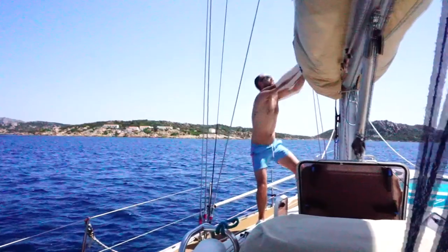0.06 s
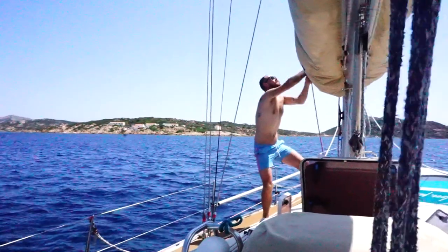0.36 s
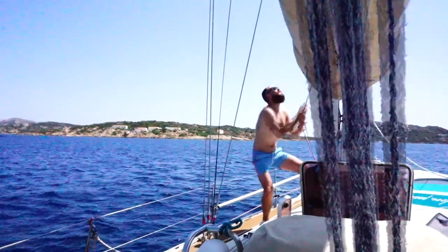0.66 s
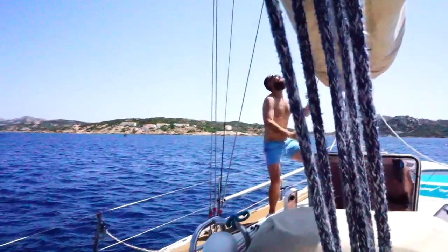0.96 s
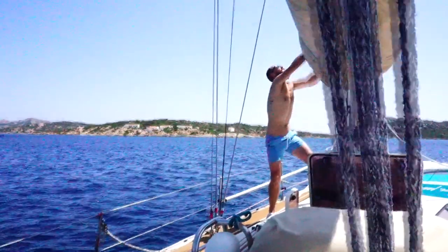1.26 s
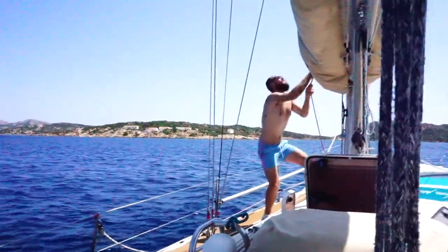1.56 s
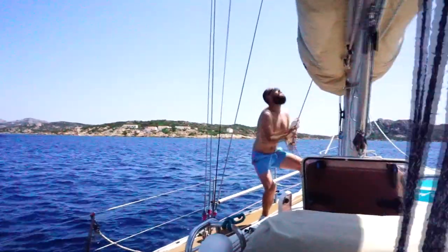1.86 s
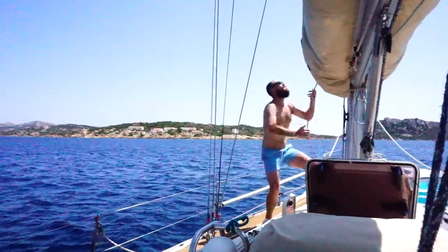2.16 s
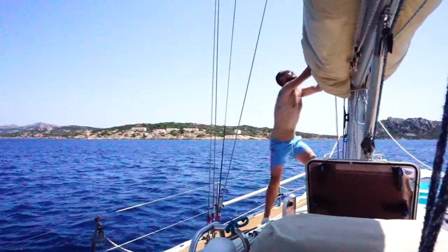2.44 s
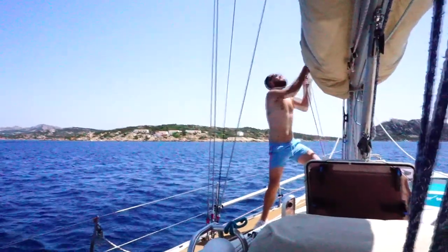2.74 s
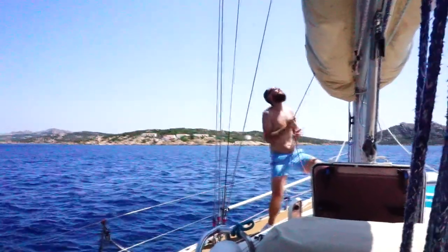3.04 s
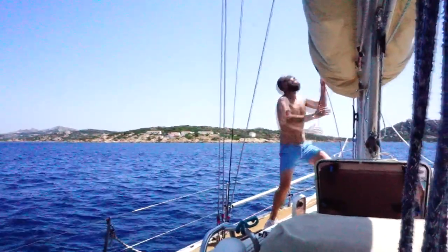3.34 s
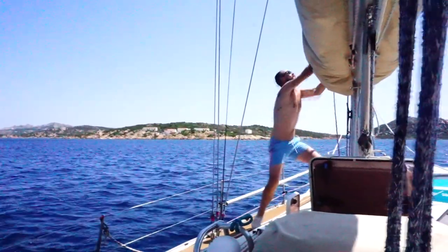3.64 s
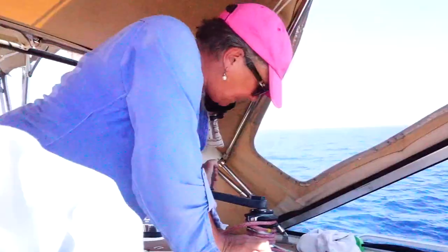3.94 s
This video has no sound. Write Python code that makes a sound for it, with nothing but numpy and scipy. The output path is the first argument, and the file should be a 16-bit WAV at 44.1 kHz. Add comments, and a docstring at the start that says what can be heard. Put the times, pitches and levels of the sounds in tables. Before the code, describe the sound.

A rope rasps through a sailboat's pulleys close by, in four pulls with high, chattering rings and faint squeals. Wind buffets the microphone, mostly from the right, over a faint wash of sea and a few dull hull slaps.

```python
"""A line rasps through the blocks of a sailboat, hauled hand over hand, close up.
The sheaves chatter as they turn and ring at two high pitches; a dry axle adds faint squeals.
Between pulls the line only twitches. Wind buffets the microphone, mostly from the right,
over a faint wash of sea and a few dull slaps on the hull."""
import sys
import numpy as np
from scipy import signal
from scipy.fft import rfft, irfft
from scipy.io import wavfile
from scipy.ndimage import uniform_filter1d, minimum_filter1d

SR = 44100
rng = np.random.default_rng(int(sys.argv[2]) if len(sys.argv) > 2 else 0)


def wav_out(sig):
    """Save sig, one row per channel (or a flat mono array), as 16-bit PCM at SR to the path in sys.argv[1]."""
    wavfile.write(sys.argv[1], SR, np.round(np.clip(np.atleast_2d(sig).T, -1, 1) * 32767).astype(np.int16))


N = 176400
T = np.arange(N) / SR
HZ = np.fft.rfftfreq(N, 1 / SR)

# Rub envelopes, one per pull; a higher level is a faster rope: t/s, level/dB
PULLS = [
    [(0, -43.5), (.43, -49.5), (.52, -42), (.66, -41.5), (.74, -51.5), (.76, -68.5)],
    [(.75, -61), (.95, -51), (1.07, -44), (1.41, -45), (1.44, -50.5), (1.68, -46), (1.77, -52.5),
     (1.795, -74)],
    [(2.16, -67.5), (2.29, -51), (2.37, -47), (2.43, -51), (2.51, -43), (2.61, -43.5), (2.66, -48.5),
     (2.85, -50), (2.895, -68)],
    [(3.17, -63), (3.33, -49), (3.5, -43.5), (3.64, -45.5), (3.7, -51), (3.86, -55.5), (4, -50.5)],
]
# Sends from the rub to the sheaves: t/s, low sheave level/dB, high sheave level/dB
SHEAVE_SENDS = [(0, 9, 10), (.2, 15, 20), (.45, 13.5, 10.5), (.58, 14.5, 19.5), (.66, 6, 10.5),
                (.74, 18.5, 16), (1.07, 12, 11), (1.18, 19.5, 18.5), (1.3, 9.5, 14.5), (1.52, 15, 11),
                (1.66, 14, 21.5), (1.76, 19.5, 9.5), (2.3, 12, 13.5), (2.56, 16, 9.5), (2.8, 15, 12),
                (3.35, 7.5, 13), (3.7, 14.5, 14)]
# Short slips of the slack line: t/s, rub level/dB, low sheave send/dB, high sheave send/dB
SLIPS = [(0.771, -43, 2, -10), (0.808, -48, -18, 17), (0.9, -44, 11, 10), (0.962, -70, 34, 43.5),
         (1.801, -49, -8.5, -22), (1.974, -47.5, 2, 10), (2.167, -53.5, 12, 12), (2.225, -49, -1, 16),
         (2.894, -55, 18.5, 6), (3.03, -54.5, 3.5, 16), (3.128, -52.5, 13.5, 16), (3.897, -58, -5, 17)]
# Tone colour of rope on sheave: f/Hz, level/dB
RASP_EQ = [(400, -5), (1050, -4), (1280, 1.5), (1520, -1.5), (1720, -12), (2000, -4), (2700, -13),
           (3250, -13), (3900, -8.5), (4150, -4.5), (4600, -16.5), (5050, -10.5), (6500, -5.5), (8000, -12),
           (10300, -15.5), (10950, -9.5)]
# Sheave modes, the low one purer, the high one rougher: f/Hz, width/Hz
SHEAVE_MODES = [(4356, 88), (4916, 145)]
AXLE_LOW_HZ, AXLE_MID_HZ, AXLE_HIGH_HZ, AXLE_THIN_HZ, AXLE_TOP_HZ = 1529, 2493, 3524, 6070, 9237
# Modes of the block and its fittings: f/Hz, width/Hz, level/dB relative to the rasp
BLOCK_MODES = [(AXLE_LOW_HZ, 30, -18), (AXLE_MID_HZ, 22, -22), (AXLE_HIGH_HZ, 70, -18),
               (AXLE_THIN_HZ, 70, -21), (7639, 60, -21), (AXLE_TOP_HZ, 55, -26), (10630, 90, -11)]
# Dry axle cues: t/s, length/s, f/Hz, level/dB
AXLE_SQUEALS = [(.62, .1, AXLE_HIGH_HZ, -44), (.63, .09, AXLE_MID_HZ, -46), (1.425, .14, AXLE_MID_HZ, -42),
                (1.44, .12, AXLE_THIN_HZ, -54), (1.45, .11, AXLE_TOP_HZ, -56),
                (1.945, .025, AXLE_MID_HZ, -59), (2.44, .35, AXLE_MID_HZ, -50.5),
                (2.48, .18, AXLE_LOW_HZ, -41), (2.53, .21, AXLE_HIGH_HZ, -41.5),
                (2.66, .22, AXLE_LOW_HZ, -49), (3.44, .25, AXLE_HIGH_HZ, -43.5),
                (3.42, .3, AXLE_LOW_HZ, -44), (3.44, .37, AXLE_MID_HZ, -50), (3.73, .1, AXLE_LOW_HZ, -44.5)]
# Tone colour of wind on the microphone: f/Hz, level/dB
WIND_EQ = [(8, -20.5), (25, 5), (60, -6), (110, -16), (200, -29), (300, -40), (450, -52), (760, -71),
           (4000, -101)]
# Gust envelope: t/s, level/dB
GUST_LEVELS = [(.28, -28), (.32, -9.5), (.42, -10.5), (.48, -16.5), (.9, -8), (2.08, -8.5), (2.17, -13),
               (2.4, -9.5), (2.68, -4), (2.8, -13.5), (3.05, -4), (3.35, -13), (3.55, -6.5), (3.88, -13),
               (3.95, -5)]
# Water hitting the hull: t/s, length/s, f/Hz, level/dB
HULL_SLAPS = [(1.044, 0.043, 704, -39), (1.195, 0.1, 650, -43), (2.08, 0.3, 313, -43.5),
              (2.304, 0.13, 640, -43.5), (3.156, 0.09, 900, -44)]
# Tone colour of the sea (f/Hz, level/dB), and its overall level
SEA_EQ, SEA_DB = [(320, -14), (700, -8), (2000, -22), (11000, -43)], -56.5

RASP_DB, SHEAVE_DB, SHEAVE_PAN_DB = 11, 1, .75
CHATTER_HZ, REFERENCE_DB, DOUBLING_DB = 48, -45, 19  # turn rate, its rub level, rise that doubles it
FIBRES_PER_S, FIBRE_SPREAD_DB, FIBRE_SHARE = 2500, 3.2, .45
RASP_CORR, RING_CORR, WIND_CORR = .76, .93, .33  # left-right correlation
WIND_LEFT_DB, LEFT_LEAD_S = -7.3, 3.9e-5


def rope_through_blocks():
    """The rope rasps and rings sheaves and block; block modes swell as it shifts in its groove."""
    rub, sheave_forces = rope_force()
    rasp = amp(RASP_DB) * rub * colour(friction(RASP_CORR), RASP_EQ)
    drive = friction(RING_CORR)
    sheaves = amp(SHEAVE_DB) * sum(ring(drive * force, hz, width, order=3)
                                   for force, (hz, width) in zip(sheave_forces, SHEAVE_MODES))
    body = amp(RASP_DB) * sum(amp(db + 3 * drift(rate_hz=6)) * ring(drive * rub, hz, width)
                              for hz, width, db in BLOCK_MODES)
    return rasp + body + sheaves * amp([[SHEAVE_PAN_DB], [-SHEAVE_PAN_DB]])


def rope_force(attack_s=.012, decay_s=.014):
    """Envelopes of the rub and of the drive on each sheave: long pulls plus quick slips."""
    level = np.max([curve(pull, left=-100, right=-100) for pull in PULLS], axis=0)
    catches = np.array([chatter(level), chatter(level)])
    rub = .5 * catches.mean(0) + .5 * amp(level)  # half chattering, half smooth
    times, *sends = np.transpose(SHEAVE_SENDS)
    sheave_forces = catches * amp([np.interp(T, times, send) for send in sends])
    for start, db, low_db, high_db in SLIPS:
        age = np.maximum(T - start, 0)
        slip = amp(db) * np.minimum(age / attack_s, 1) * np.exp(-(age / decay_s) ** 2)
        rub += slip
        sheave_forces += slip * amp([[low_db], [high_db]])
    return rub, sheave_forces


def friction(correlation):
    """Fibres snap over the groove: stereo grains in a smooth hiss."""
    snaps = rng.random(N) < FIBRES_PER_S / SR
    strength = amp(FIBRE_SPREAD_DB * np.minimum(rng.exponential(1, N), 4))
    grains = unit_rms(snaps * strength * rng.choice([-1., 1.], (2, N)))
    hiss = rng.standard_normal((2, N))
    return stereo(np.sqrt(FIBRE_SHARE) * grains + np.sqrt(1 - FIBRE_SHARE) * hiss, correlation)


def chatter(level, jitter=.25):
    """A sheave catches once a turn: a tremolo, faster and shallower as the rope speeds up."""
    speed_db = np.clip(level - REFERENCE_DB, -15, 6)
    turn_hz = CHATTER_HZ * 2 ** (speed_db / DOUBLING_DB) * (1 + jitter * drift(rate_hz=30))
    angle = 2 * np.pi * np.cumsum(turn_hz) / SR
    catch = unit_rms(np.sin(angle) + .5 * np.sin(2 * angle))
    depth_db = 2.6 - .24 * speed_db
    trim_db = depth_db ** 2 * np.log(10) / 20  # offsets the power the tremolo adds
    return amp(level + depth_db * catch - trim_db)


def axle(wander_hz=12, flutter_db=3):
    """A dry axle squeals in thin, wavering tones that swell and fade."""
    squeals = np.zeros(N)
    for start, length, hz, db in AXLE_SQUEALS:
        pitch = hz + wander_hz * drift(rate_hz=52)
        tone = np.sin(2 * np.pi * np.cumsum(pitch) / SR)
        flutter = amp(flutter_db * drift(rate_hz=43))
        squeals += amp(db) * np.sqrt(abs(arch(start, length))) * unit_rms(tone * flutter)
    return squeals


def wind(crossover_hz=63, eddy_db=3.5, buffet_db=2.2):
    """Gusts press on the microphone in a lumpy rumble; passing eddies flutter its upper band."""
    air = colour(stereo(rng.standard_normal((2, N)), WIND_CORR), WIND_EQ)
    low = lowpass(air, crossover_hz)
    swirl = stereo([drift(rate_hz=28), drift(rate_hz=28)], WIND_CORR)
    eddies = unit_rms(amp(eddy_db * swirl))
    gusts = amp(curve(GUST_LEVELS) + buffet_db * drift(rate_hz=7))
    return (low + (air - low) * eddies) * gusts * amp([[WIND_LEFT_DB], [0]])


def sea():
    """Small waves make a faint bed; water slaps the hull in dull, grainy bursts."""
    swell = amp(SEA_DB + 2 * drift(rate_hz=10))
    wash = swell * colour(stereo(rng.standard_normal((2, N)), correlation=.6), SEA_EQ)
    splash = friction(RASP_CORR)  # the rope's grain doubles as water texture
    slaps = sum(amp(db) * arch(start, length) * ring(splash, hz, width_hz=.69 * hz, order=2)
                for start, length, hz, db in HULL_SLAPS)
    return wash + slaps


def amp(db):
    """Decibels to gain."""
    return 10 ** (np.asarray(db) / 20)


def unit_rms(x):
    """Normalises each channel to an rms of one."""
    return x / np.sqrt(np.mean(x ** 2, axis=-1, keepdims=True) + 1e-20)


def curve(points, **ends):
    """A straight-line envelope through (t/s, value) points."""
    return np.interp(T, *np.transpose(points), **ends)


def arch(start, length):
    """A half-sine swell from silence to one and back."""
    return np.sin(np.pi * np.clip((T - start) / length, 0, 1))


def colour(x, eq):
    """Shapes x with an EQ curve (f/Hz, level/dB), at an rms of one."""
    hz, db = np.transpose(eq)
    gain = amp(np.interp(np.log(HZ + 1), np.log(hz), db))
    return unit_rms(irfft(rfft(x) * gain, N))


def lowpass(x, cutoff_hz):
    """Rolls off the top at 24 dB per octave."""
    return irfft(rfft(x) / (1 + (HZ / cutoff_hz) ** 4), N)


def drift(rate_hz):
    """Smooth random modulation up to about the given rate."""
    return unit_rms(lowpass(rng.standard_normal(N), rate_hz))


def stereo(x, correlation):
    """Narrows two unrelated channels by blending the left into the right."""
    return np.array([x[0], correlation * x[0] + np.sqrt(1 - correlation ** 2) * x[1]])


def ring(x, hz, width_hz, order=1):
    """A resonator that keeps the power of white noise; a higher order has steeper skirts."""
    t = T[:6000]
    mode = t ** (order - 1) * np.exp(-np.pi * width_hz * t) * np.sin(2 * np.pi * hz * t)
    return signal.oaconvolve(x, mode[None] / np.linalg.norm(mode), axes=1)[:, :N]


def scene():
    """The mix: rope and axle, arriving a touch earlier on the left, with wind and sea."""
    left, right = rope_through_blocks() + axle()
    right = irfft(rfft(right) * np.exp(-2j * np.pi * HZ * LEFT_LEAD_S), N)
    return np.array([left, right]) + wind() + sea()


def record(dry):
    """A fast stereo-linked limiter holds the strongest gusts; a steep low-pass cuts the top."""
    ceiling, cutoff_hz = .92, 11080
    gain = np.minimum(1, ceiling / (abs(dry).max(0) + 1e-9))
    held = minimum_filter1d(gain, size=401)
    smoothed = uniform_filter1d(uniform_filter1d(held, size=201), size=201)
    high_cut = signal.firwin(801, cutoff_hz, window=("kaiser", 8), fs=SR)
    return signal.oaconvolve(dry * smoothed, high_cut[None], "same")


dry = scene()
out = record(dry)
wav_out(out)
```